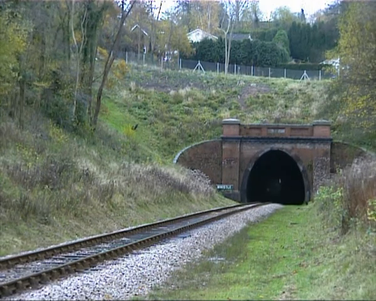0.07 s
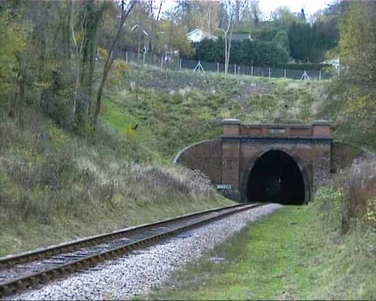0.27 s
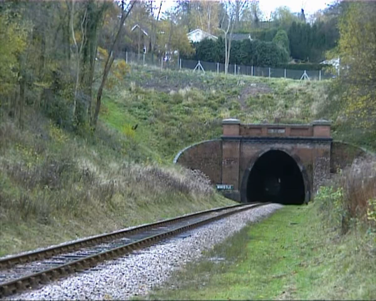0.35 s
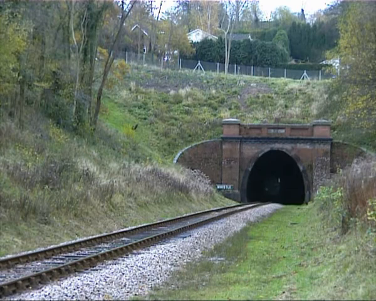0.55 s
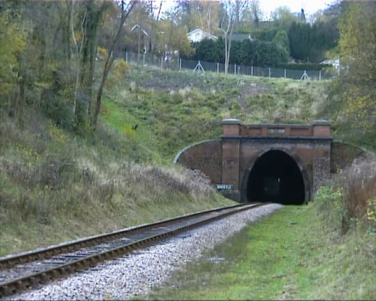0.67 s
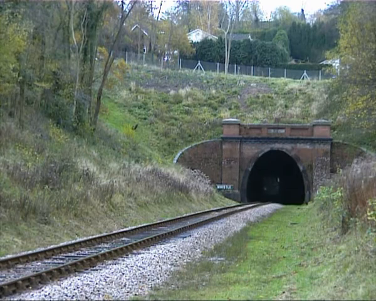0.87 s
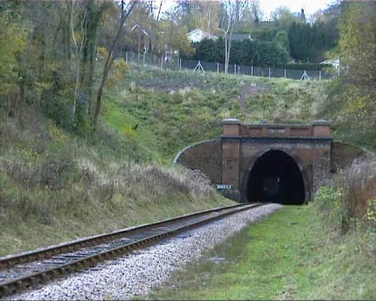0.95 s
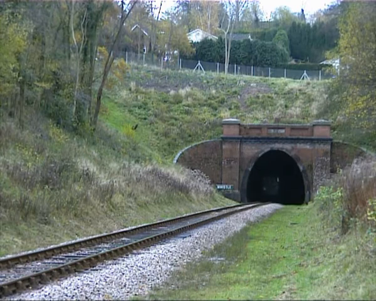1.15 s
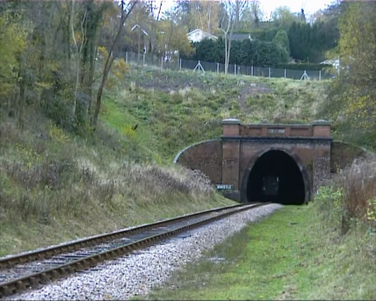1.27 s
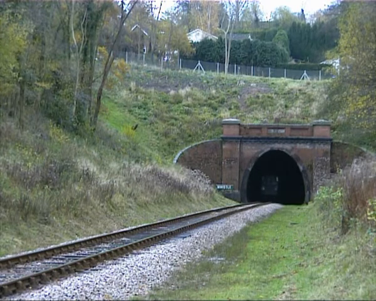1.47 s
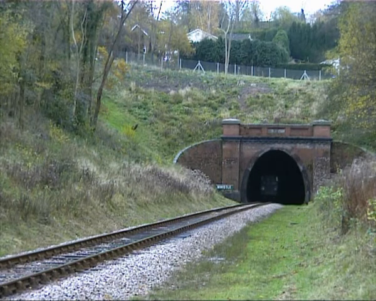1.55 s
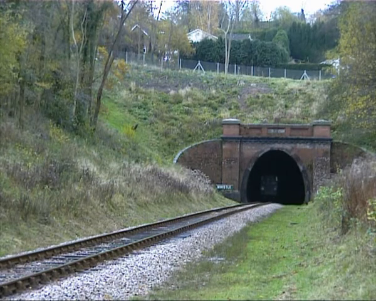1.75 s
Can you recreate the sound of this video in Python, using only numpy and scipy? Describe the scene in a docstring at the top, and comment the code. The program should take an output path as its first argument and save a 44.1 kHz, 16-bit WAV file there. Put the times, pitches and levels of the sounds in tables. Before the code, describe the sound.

Heard from outside a railway tunnel, a steam whistle sounds once, loud and slightly wavering, then rings away in the bore. Beneath it the locomotive rumbles quietly with faint, uneven exhaust puffs.

```python
"""In a railway cutting outside a tunnel, one short whistle blast comes from a steam locomotive within.
Steam drives the whistle's bell into a harmonic note. The engine is moving, so the tunnel returns the note
Doppler-shifted to slightly lower and higher pitches, which beat with it and reverberate. The jet hisses
with the blast; underneath, the train rumbles closer with soft exhaust beats."""
import sys
import numpy as np
from scipy import signal
from scipy.fft import rfft, irfft, next_fast_len
from scipy.io import wavfile
from scipy.ndimage import uniform_filter1d

SR = 44100
rng = np.random.default_rng(int(sys.argv[2]) if len(sys.argv) > 2 else 0)


def int16_out(signal):
    """Quantize to a 16-bit WAV file."""
    q = np.round(np.clip(np.atleast_2d(signal).T, -1, 1) * 32767)
    wavfile.write(sys.argv[1], SR, q.astype(np.int16))


N = 79380
T = np.arange(N) / SR
SIZE = next_fast_len(2 * N)
HZ = np.maximum(np.arange(SIZE // 2 + 1) * SR / SIZE, 1)

OPEN_S, ATTACK_S, CLOSE_S, RELEASE_S = 0.17, 0.12, 0.85, 0.135   # the steam valve
JITTER_HZ = 83.6   # bandwidth of fast pitch fluctuation
# Gain of the overtones and the hiss through the blast: (time [s], level [dB])
TREBLE_GAIN = [(0.24, -0.5), (0.3, -1), (0.365, 1), (0.42, -3.5), (0.5, -2), (0.57, 1.5), (0.64, -2),
               (0.74, 0.5), (0.87, .5), (0.96, -2)]


def whistle(level_db=-15.5, walls_db=-9, walls_t60_s=0.34, walls_full_hz=2570):
    """Multipath interference: each path has its own Doppler shift, so the arrivals beat together."""
    # Paths to the listener: (pitch ratio [1], delay [s], level [dB], overtone gain [dB],
    # tunnel ring [dB], pitch jitter [fraction])
    paths = [(1.0, 0.0039, -2.5, -6.5, -8.5, .006), (1.014, 0.03, -11.5, 7, -3.5, 0.00705),
             (0.953, 0.045, -7.5, 2.5, -4.5, .008), (0.985, 0.02486, -10, 6, 0.5, 0.01503),
             (1.068, 0.14, -17, 2.5, 4, 0.017), (1.11, 0.26, -23, -4.5, 6.5, 0.023)]
    scatter = from_db(walls_db) * np.minimum(HZ / walls_full_hz, 1)   # early reflections at the mouth
    arrivals = 0
    for ratio, delay, db, overtones_db, ring_db, jitter in paths:
        response = 1 + scatter * echoes(walls_t60_s) + from_db(ring_db) * tunnel()
        note = bell(T - delay, ratio, overtones_db, jitter)
        arrivals += from_db(db) * filtered(note, response) / np.sqrt(1 + from_db(2 * ring_db))
    return from_db(level_db) * filtered(arrivals, pair_phase())


def bell(t, ratio, overtones_db, jitter, wander=0.006, speak_s=0.082):
    """A jet-driven resonator is nonlinear: higher harmonics grow as higher powers of the pressure."""
    # Pitch as the steam comes up, before Doppler shift: (time [s], frequency [Hz])
    pitch = [(0.17, 807.6), (0.22, 832.2), (0.27, 840.6), (0.33, 871.8), (0.42, 879.6), (0.6, 882.7),
             (0.75, 881.4), (0.88, 877.1), (0.98, 877.2)]
    # Harmonics from the fundamental up: (relative level [dB])
    harmonics = [0.5, -13, -16.5, -26.5, -31.5, -32.5, -44.5, -51.5, -54.5, -61, -59.5, -69.5]
    unsteadiness = 1 + wander * drift(hz=13.77) + jitter * drift(JITTER_HZ)
    hz = np.interp(t, *np.transpose(pitch)) * ratio * unsteadiness
    phase = 2 * np.pi * np.cumsum(hz) / SR
    blowing = pressure(t)
    treble_db, = in_time(TREBLE_GAIN)
    note = 0
    for k, db in enumerate(harmonics):
        flutter_db = (3.5 if k else 3) * drift(hz=25.4)
        brightness_db = overtones_db + treble_db if k else 0
        gain = from_db(db + flutter_db + brightness_db) * blowing ** (0.38 + 0.68 * k)
        note += gain * np.sin((k + 1) * phase + rng.uniform(0, 2 * np.pi))
    build_up = np.clip((t - OPEN_S) / speak_s, 0, 1)
    return np.sqrt(2) * note * onset_gain(t) * build_up


def pressure(t):
    """Driving pressure, 0 to 1: the valve opens, holds and shuts."""
    opening = np.clip((t - OPEN_S) / ATTACK_S, 0, 1) * np.clip(1 - (t - CLOSE_S) / RELEASE_S, 0, 1)
    return np.sin(np.pi / 2 * opening)


def onset_gain(t, peak_db=2.5, settle_s=0.06):
    """Exponential decay: the whistle and hiss start slightly louder, then quickly settle."""
    return from_db(peak_db * np.exp(-np.maximum(t - OPEN_S, 0) / settle_s))


def steam(level_db=-37.5, lag_s=0.021, ring_db=-6):
    """Turbulence in the jet hisses while the valve is open; reverberation prolongs it."""
    # Jet spectrum: (frequency [Hz], relative density [dB])
    spectrum = [(300, -5), (700, -9), (1000, 3), (1400, 4), (2100, 3), (2800, 0.5), (3500, -2.5),
                (3900, -29), (4300, -5), (5300, -9), (6000, -19), (7500, -21.5), (9500, -31.5),
                (12000, -39), (16000, -47.5)]
    treble_db, = in_time(TREBLE_GAIN)
    jet = stereo_noise(over_hz(spectrum)) * pressure(T - lag_s) ** 2 * onset_gain(T) * from_db(treble_db)
    return from_db(level_db) * filtered(jet, 1 + from_db(ring_db) * tunnel())


def train():
    """Source and filter: the same resonances colour both rolling noise and exhaust."""
    # Spectral peaks and dips: (frequency [Hz], width [Hz], gain [dB])
    resonances = [(214.4, 41, -1), (538, 32, 4.5), (672, 22, 7), (815, 13, 2), (841, 37, 9.5),
                  (967, 19, 9.5), (1038, 30, -5.5), (1122, 32, 7.5), (1260, 31, 3.5), (1370, 8.7, -5.5),
                  (1502, 10, 9.5)]
    colour_db = sum(db * np.exp(-0.5 * ((HZ - hz) / width) ** 2) for hz, width, db in resonances)
    return rumble(colour_db) + exhaust(colour_db)


def rumble(colour_db, bass_hz=296, flicker_db=1.0):
    """Rolling radiates broadband noise; the rumble sounds quieter during the blast, then returns with more
    bass."""
    # Rolling spectrum: (frequency [Hz], relative density [dB])
    spectrum = [(25, -38.5), (60, -23.5), (110, -17), (150, -24.5), (215, 5.5), (300, -13), (370, -1.5),
                (450, -9.5), (560, -5.5), (900, -10), (1400, -7.5), (2000, -10), (2700, -19.5), (3400, -19),
                (3900, -35.5), (4600, -23), (5500, -31), (7000, -38), (10000, -42.5), (15500, -50)]
    # Loudness of the rumble: (time [s], level [dB], extra bass [dB])
    rumble_levels = [(0, -40, 0.5), (0.3, -39, -2), (0.6, -46, 4), (0.95, -39, -2), (1.15, -38.5, 0),
                     (1.35, -37.5, 5.5), (1.58, -39, 1), (1.8, -37.5, 8)]
    level_db, bass_db = in_time(rumble_levels)
    rolling = stereo_noise(over_hz(spectrum) + colour_db)
    bass = filtered(rolling, 1 / (1 + (HZ / bass_hz) ** 6))
    return (rolling + bass * (from_db(bass_db) - 1)) * from_db(level_db + flicker_db * drift(hz=34))


def exhaust(colour_db, rise_s=0.009):
    """Each puff is a burst of turbulent noise with exponential rise and decay."""
    # Exhaust beats: (time [s], level [dB], decay [s])
    chuffs = [(0.05, -53, 0.009), (0.141, -39.5, 0.014), (0.269, -35.5, .02), (0.334, -36, 0.022),
              (0.364, -25.5, 0.012), (0.529, -30.5, .03), (1.415, -35, 0.02), (1.524, -38, 0.038),
              (1.655, -40.5, 0.01765), (1.737, -27.5, 0.012), (1.786, -37.5, 0.026)]
    # Spectrum of a beat: (frequency [Hz], relative density [dB])
    spectrum = [(60, -34.5), (200, -7.5), (400, -12.5), (700, 1.5), (1300, -4.5), (2100, -9.5), (3200, -19),
                (3900, -30), (4700, -29), (7000, -40.5), (15000, -57.5)]
    beats = sum(from_db(db) * np.exp(-np.maximum((s - T) / rise_s, (T - s) / decay))
                for s, db, decay in chuffs)
    return beats * stereo_noise(over_hz(spectrum) + colour_db)


def ticks(decay_s=0.0007, dull_hz=6000):
    """Very short noise impulses are heard as faint broadband ticks during the blast."""
    # Impulses: (time [s], level before filtering [dB])
    impulses = [(0.319, -37.5), (0.376, -29), (0.416, -44), (0.598, -32.5), (0.793, -37.5), (0.928, -45),
                (0.958, -37)]
    envelope = sum(from_db(db) * np.exp(-np.abs(T - s) / decay_s) for s, db in impulses)
    return filtered(envelope * rng.standard_normal((2, N)), 1 / np.sqrt(1 + (HZ / dull_hz) ** 4))


def bumps(rise_s=0.0021, band_hz=(20, 160), flutter_db=-64.5, lag_s=0.065):
    """Band-limited pulses at the microphone sound dull; a faint low flutter follows the blast."""
    # Pulses: (time [s], level before filtering [dB])
    pulses = [(0.375, -28.5), (0.505, -48), (0.792, -44.5), (0.95, -60.5)]
    knocks = 0
    for s, db in pulses:
        age = np.maximum(T - s, 0) / rise_s
        knocks += from_db(db) * age * np.exp(1 - age)
    thuds = signal.sosfilt(signal.butter(1, band_hz, "band", fs=SR, output="sos"), knocks)
    flutter = from_db(flutter_db) * drift(hz=50) * pressure(T - lag_s) ** 4
    return (thuds + flutter) * from_db([[-2], [2]])   # stronger on the right


def thin_tones(wander=0.002):
    """Faint tones far above the note waver by frequency modulation, only near full pressure."""
    # High tones: (frequency [Hz], level [dB])
    partials = [(9400, -72), (10240, -75), (11120, -79.5)]
    tones = 0
    for hz, db in partials:
        wavering_hz = hz * (1 + wander * drift(JITTER_HZ))
        tones += from_db(db) * np.sin(2 * np.pi * np.cumsum(wavering_hz) / SR)
    return tones * pressure(T) ** 6


def tunnel(bass_t60_s=1.345, treble_t60_s=1, split_hz=2200):
    """Reverberation of the bore: absorption rises with frequency, so the treble dies first."""
    low = 1 / (1 + (HZ / split_hz) ** 2)
    return np.sqrt(low) * echoes(bass_t60_s) + np.sqrt(1 - low) * echoes(treble_t60_s)


def echoes(t60):
    """Frequency response of dense reflections that decay exponentially, with unit energy."""
    tail = rng.standard_normal(N) * from_db(-60 * T / t60)
    return rfft(tail / np.sqrt(np.sum(tail ** 2)), SIZE)


def stereo_noise(spectrum_db):
    """Partial coherence: a common and a diffuse noise add at the microphone pair, at unit power."""
    # Power common to both channels: (frequency [Hz], share [fraction])
    coherence = [(40, 1), (130, 0.74), (300, .97), (700, 0.91), (1400, 0.94), (3100, 0.81), (6800, 0.44),
                 (15000, .05)]
    shared = np.clip(over_hz(coherence), 0, 1)
    noise = rfft(rng.standard_normal((3, SIZE))) * from_db(spectrum_db)
    common = np.sqrt(shared) * noise[0] * pair_phase()
    diffuse = np.sqrt(1 - shared) * noise[1:]
    return rms_one(irfft(common + diffuse, SIZE)[:, :N])


def pair_phase():
    """Phase difference between the channels: small in the treble, growing towards the bass."""
    # Lead of the left channel: (frequency [Hz], phase [rad])
    lead = [(40, 3), (130, 2.8), (215, 2.45), (350, 1.87), (600, 1.15), (880, 0.79), (1700, 0.34),
            (3000, 0.37), (6000, 0.21), (15000, .5)]
    return np.exp(0.5j * over_hz(lead) * np.array([[1], [-1]]))


def drift(hz):
    """Random fluctuation of unit power, low-passed at hz."""
    return rms_one(filtered(rng.standard_normal(N), 1 / (1 + (HZ / hz) ** 2)))


def filtered(x, response):
    """Convolution as a product of spectra."""
    return irfft(rfft(x, SIZE) * response, SIZE)[..., :N]


def in_time(rows):
    """Interpolate each column at every sample."""
    s, *columns = np.transpose(rows)
    return [np.interp(T, s, c) for c in columns]


def over_hz(points):
    """Interpolate a spectrum over log frequency."""
    hz, value = np.transpose(points)
    return np.interp(np.log(HZ), np.log(hz), value)


def from_db(db):
    """Decibels to amplitude ratio."""
    return 10 ** (np.asarray(db) / 20)


def rms_one(x):
    """Scale to unit power."""
    return x / np.sqrt(np.mean(x ** 2) + 1e-20)


def scene():
    """The sources superpose; a level difference sets the tunnel mouth a little to the right."""
    # Channel balance: (frequency [Hz], left minus right [dB])
    level_difference = [(60, 0), (200, -.5), (400, -2.5), (870, -3), (1700, -2), (2600, -0.6), (4400, 0.4),
                        (6000, 2.5), (9000, 0), (15000, -0.5)]
    balance = from_db(over_hz(level_difference) * np.array([[0.5], [-0.5]]))
    tunnel_mouth = whistle() + steam() + train() + thin_tones()
    return filtered(tunnel_mouth, balance) + ticks() + bumps()


def record(dry, limit_db=-5, recovery_db_per_s=86.5, cutoff_hz=15800):
    """Peak limiting holds down the strongest beats; a steep low-pass bounds the bandwidth."""
    over_db = np.maximum(20 * np.log10(np.abs(dry).max(axis=0) + 1e-9) - limit_db, 0)
    held_db = np.maximum.accumulate(over_db + recovery_db_per_s * T) - recovery_db_per_s * T
    limited = dry * from_db(-uniform_filter1d(held_db, size=180))
    return filtered(limited, 1 / (1 + (HZ / cutoff_hz) ** 200))


dry = scene()
out = record(dry)
int16_out(out)
```